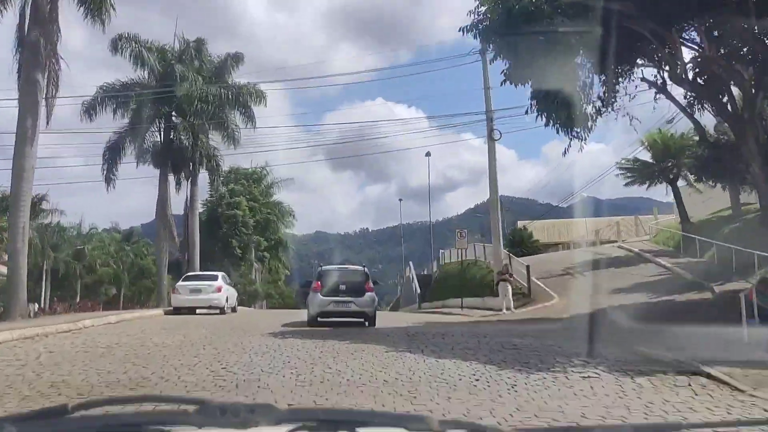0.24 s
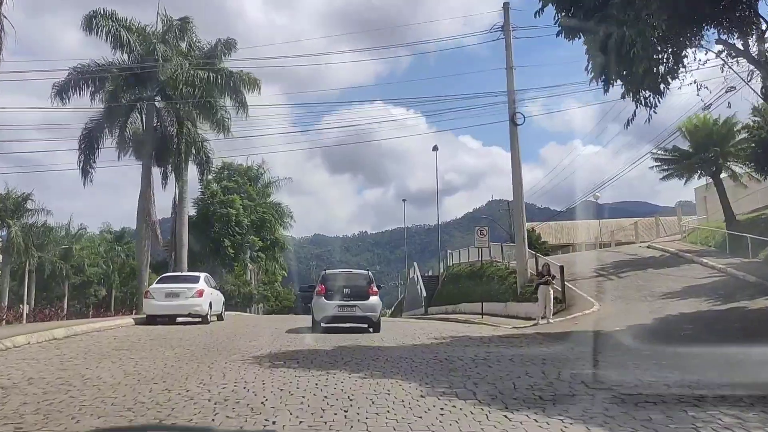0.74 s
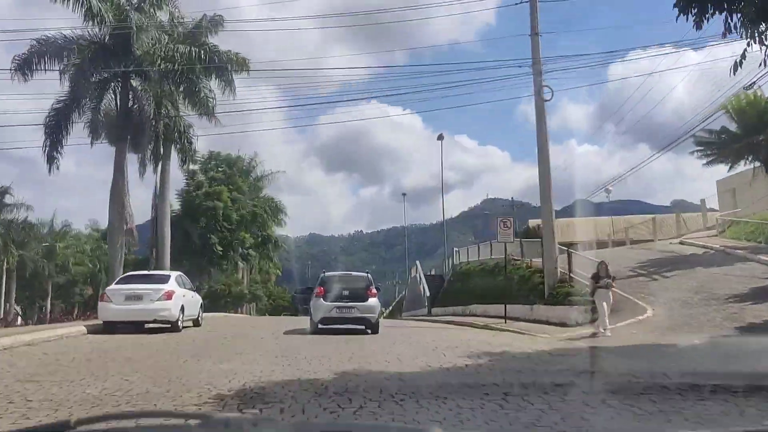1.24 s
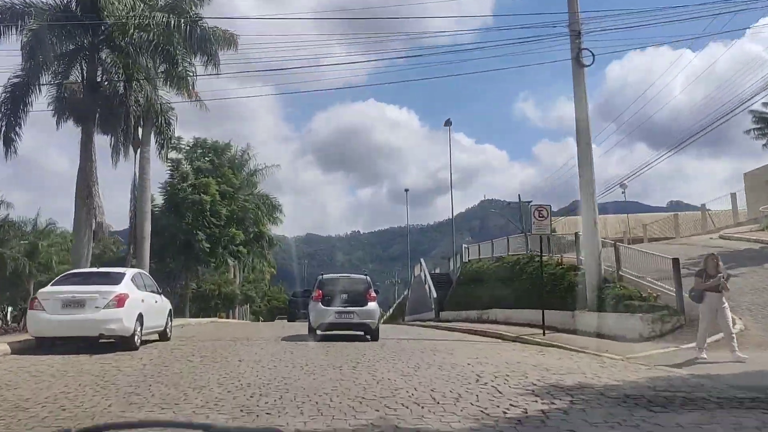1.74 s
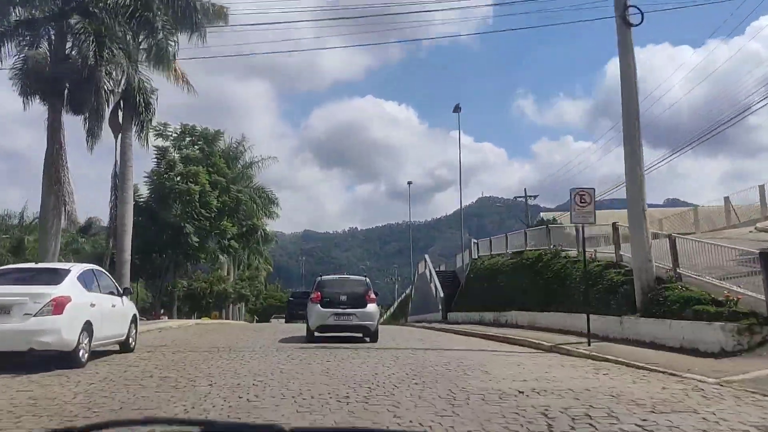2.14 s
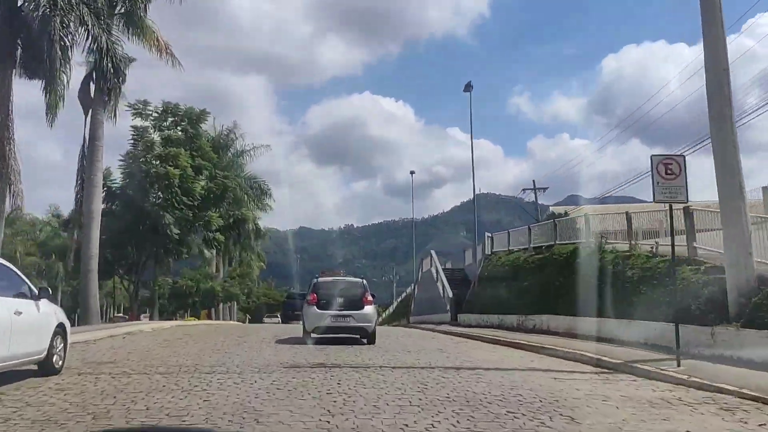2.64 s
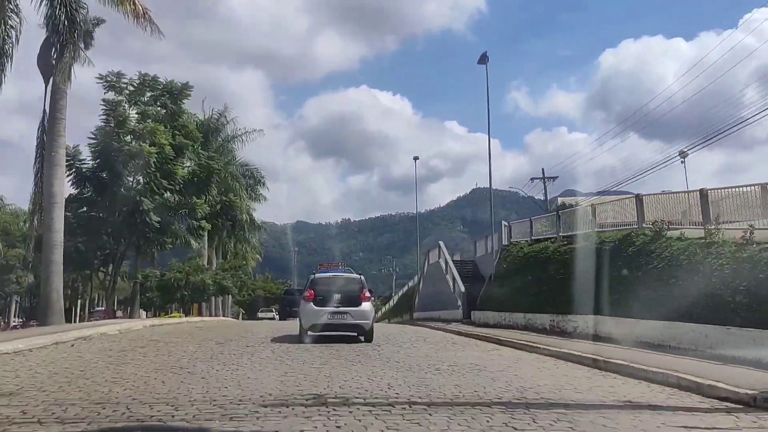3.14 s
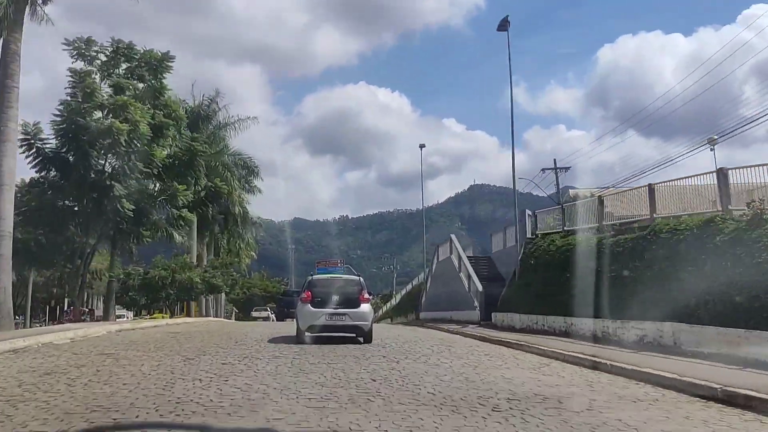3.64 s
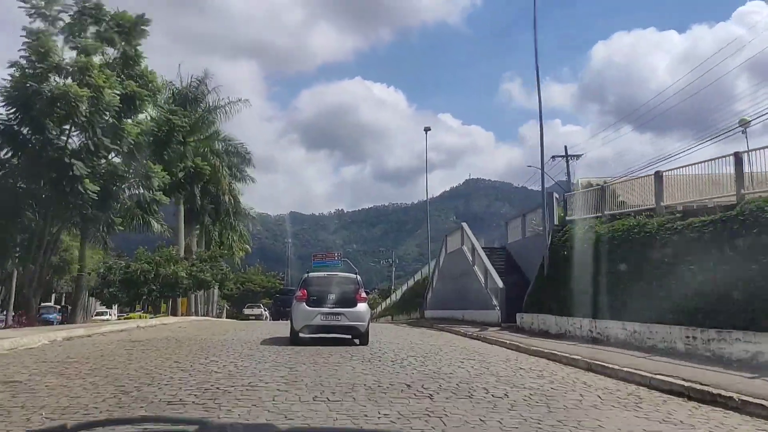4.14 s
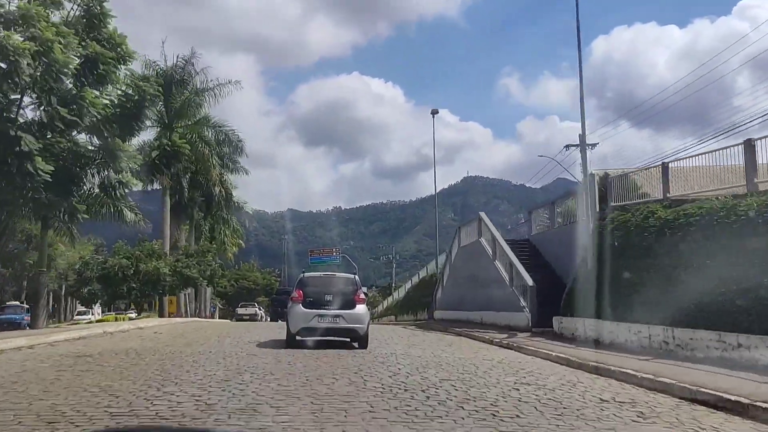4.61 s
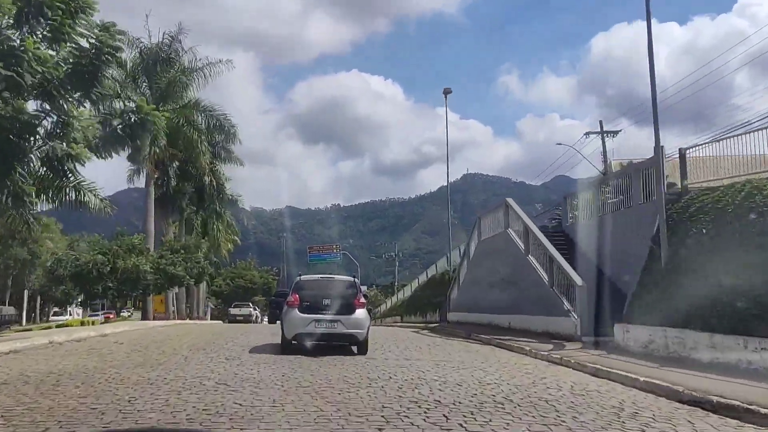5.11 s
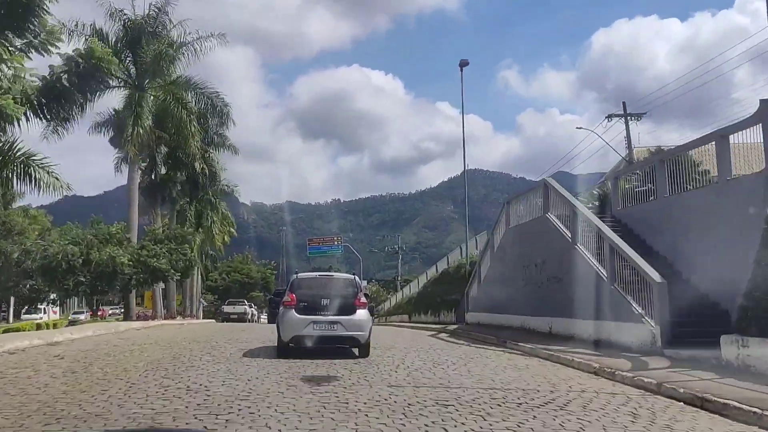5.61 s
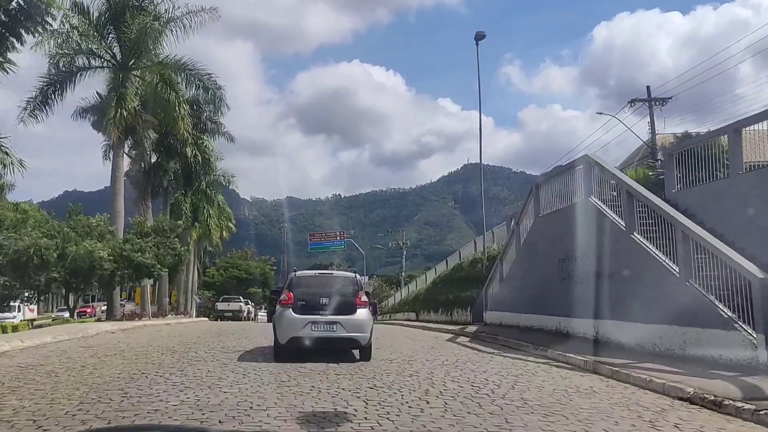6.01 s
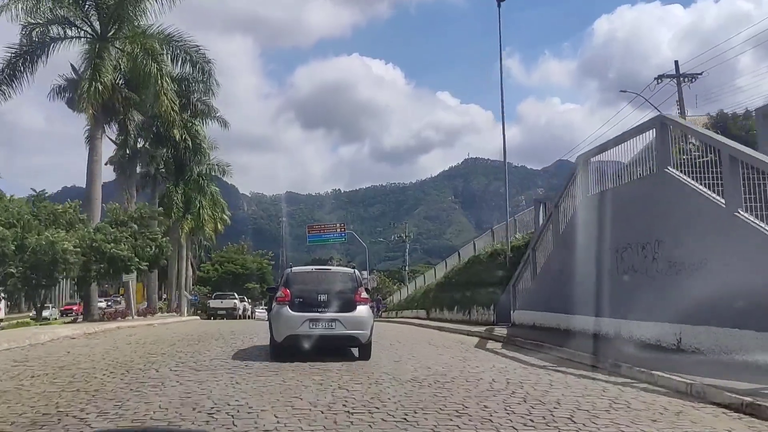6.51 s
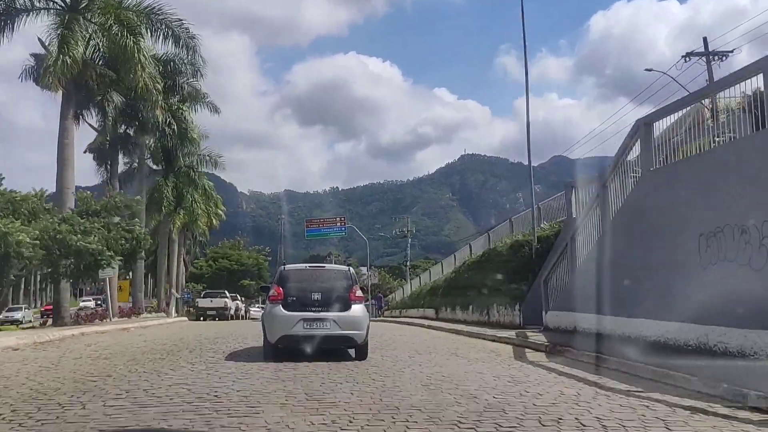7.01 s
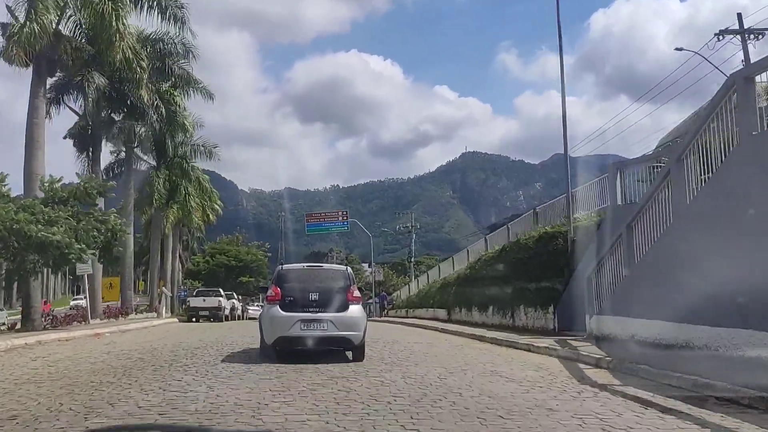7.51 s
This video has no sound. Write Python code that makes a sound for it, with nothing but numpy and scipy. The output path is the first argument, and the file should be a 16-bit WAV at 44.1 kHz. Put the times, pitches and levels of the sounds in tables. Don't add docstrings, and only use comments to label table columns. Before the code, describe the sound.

Inside a slow car on a stone-paved street, tyres drum and boom continuously while the engine hums low and loose trim quietly rattles.

```python
import sys
import numpy as np
from scipy import signal
from scipy.fft import rfft, irfft, next_fast_len
from scipy.io import wavfile
from scipy.ndimage import map_coordinates

SR = 44100
rng = np.random.default_rng(int(sys.argv[2]) if len(sys.argv) > 2 else 0)


def level_to_linear(level):
    exponent = np.asarray(level, float) / 20
    return 10 ** exponent


def to_wav(sig):
    pcm = np.clip(np.atleast_2d(sig), -1, 1) * 32767
    pcm = np.round(pcm).astype(np.int16)
    wavfile.write(sys.argv[1], SR, pcm.T)


N = 342216


def unit(x):
    return x / np.sqrt(np.mean(x ** 2) + 1e-20)


def curves(rows):
    time_s, *columns = np.transpose(rows)
    return [np.interp(np.arange(N) / SR, time_s, column) for column in columns]


def wobble(rate_hz):
    knots = rng.standard_normal(int(SR / 10))
    return map_coordinates(knots, [np.arange(N) * rate_hz / SR])


def filtered(x, response):
    size = next_fast_len(N + SR // 2)
    spectrum = rfft(x, size) * response(np.fft.rfftfreq(size, 1 / SR))
    return irfft(spectrum, size)[..., :N]


def shape(points):
    point_hz, point_db = np.transpose(points)
    return lambda hz: level_to_linear(np.interp(np.log(hz + 1), np.log(point_hz + 1), point_db))


def modes(table):
    def response(hz):
        total = 0
        for k, (centre_hz, width_hz, gain_db) in enumerate(table):
            damping = 1j * hz * width_hz
            total = total + (-1) ** k * level_to_linear(gain_db) * damping / (centre_hz ** 2 - hz ** 2 + damping)
        return total
    return response


def grit(response, spread_db):
    size = next_fast_len(N)
    knocks = rng.standard_normal(size)
    knocks = knocks * level_to_linear(spread_db * np.clip(rng.standard_normal(size), -2.5, 2.5))
    spectrum = rfft(knocks) * response(np.fft.rfftfreq(size, 1 / SR))
    return unit(irfft(spectrum, size)[:N])


def tyres():
    # start_s, cabin_boom_db, floor_drum_db, tyre_roar_db
    road = [(0.0, -26.5, -39, -42.5), (0.11, -49, -34, -45.5), (0.13, -42.5, -35, -43),
            (0.26, -32.5, -31, -41), (0.52, -39, -32, -45), (0.67, -34.5, -34, -35),
            (0.73, -40.5, -38, -50.5), (0.99, -39, -34.5, -43), (1.25, -35, -35.5, -41.5),
            (1.38, -40, -30.5, -41.5), (1.66, -38.5, -38.5, -44.5), (1.71, -29.5, -38, -38),
            (1.75, -38.5, -32, -41.5), (1.94, -41.5, -34.5, -41), (2.03, -34, -34.5, -45),
            (2.14, -40.5, -34, -38.5), (2.18, -34, -33.5, -43), (2.23, -38, -32, -43),
            (2.31, -37, -36, -43), (2.33, -34.5, -31.5, -46), (2.38, -47, -41.5, -47.5),
            (2.44, -42, -32.5, -45), (2.55, -47, -37, -48), (2.61, -37.5, -42, -45.5),
            (2.66, -38.5, -38.5, -43.5), (2.83, -32, -36, -44.5), (2.87, -34.5, -37, -46),
            (3.13, -42, -37.5, -46.5), (3.15, -34, -35.5, -39), (3.44, -31.5, -36.5, -44.5),
            (3.52, -35.5, -33, -43.5), (3.76, -36.5, -36.5, -42.5), (3.87, -43.5, -32, -42),
            (3.91, -34.5, -32, -41.5), (4.11, -37.5, -36.5, -44.5), (4.23, -36, -31.5, -38.5),
            (4.28, -35, -34, -43), (4.56, -38, -35, -41.5), (4.58, -34, -33.5, -42.5),
            (4.8, -37.5, -35, -45), (4.84, -32, -34.5, -37.5), (4.88, -34, -36.5, -49.5),
            (4.93, -35, -36.5, -44.5), (5.06, -35.5, -36, -43.5), (5.12, -34, -33, -41),
            (5.14, -35, -42, -37), (5.17, -40, -36, -44.5), (5.21, -33, -29.5, -40.5),
            (5.27, -37, -35.5, -40.5), (5.53, -36.5, -29.5, -43), (5.57, -34, -34, -37),
            (5.71, -37, -34.5, -45), (5.77, -32, -36, -44.5), (5.9, -41, -30.5, -45),
            (5.97, -36.5, -29, -41), (6.03, -44.5, -38.5, -49.5), (6.38, -36, -33.5, -41),
            (6.46, -40, -32, -47), (6.51, -36, -38.5, -45), (6.65, -39, -34, -42.5),
            (6.72, -28, -34.5, -42.5), (6.79, -39, -31.5, -40.5), (7.0, -34, -35.5, -44),
            (7.02, -36.5, -29.5, -42), (7.15, -30.5, -31, -52), (7.24, -37, -29.5, -39),
            (7.3, -37.5, -38.5, -42.5), (7.46, -35.5, -33, -41), (7.54, -35, -38.5, -42),
            (7.61, -31, -37, -40.5), (7.67, -49, -35.5, -40), (7.72, -31, -44, -40.5),
            (7.76, -41, -33, -41.5)]
    # centre_hz, width_hz, gain_db
    cabin_modes = [(30.2, 10, -11), (47.5, 12, -3), (63.3, 16, -1.5), (98.6, 23, -1)]
    # centre_hz, width_hz, gain_db
    pan_modes = [(126.5, 16, 1), (167.9, 26.5, -4.5), (191.6, 28.6, -5), (258, 46, -13)]
    # centre_hz, width_hz, gain_db
    panel_modes = [(776, 19, 2.5), (551, 68, -11), (2160, 140, -5.5)]
    # freq_hz, density_db (per Hz)
    roar_spectrum = [(120, -26), (200, -2), (276, -3.5), (352, -8.5), (543, -16), (669, -25), (775, -22.5),
                     (933, -27), (2050, -42), (3800, -57.5), (4940, -83.5), (8360, -120)]

    def boom_response(hz):
        return modes(cabin_modes)(hz) / (1 + (hz / 140) ** 2)

    def drum_response(hz):
        return modes(pan_modes)(hz) / (1 + (hz / 330) ** 2) / (1 + (90 / (hz + 1)) ** 4)

    def roar_response(hz):
        return shape(roar_spectrum)(hz) * (1 + abs(modes(panel_modes)(hz)))

    boom_db, drum_db, roar_db = curves(road)
    boom = level_to_linear(boom_db + 2.7) * grit(boom_response, spread_db=2.5)
    drum = level_to_linear(drum_db - 0.65) * grit(drum_response, spread_db=3.5)
    roar = level_to_linear(roar_db + 1.17 + 0.84 * wobble(16)) * grit(roar_response, spread_db=6)
    return boom + drum + roar


def engine():
    # start_s, firing_hz, level_db
    firing = [(0.0, 50.5, -51), (0.04, 50, -42), (0.11, 49.8, -34), (0.17, 45.2, -31.5), (0.43, 44.2, -36),
              (0.69, 49.9, -28.5), (0.8, 51, -40.5), (0.95, 55.3, -31), (1.06, 52.3, -23),
              (1.15, 51.6, -39), (1.27, 51.1, -26), (1.32, 53, -43), (1.4, 56.3, -33), (1.49, 49.9, -39),
              (1.53, 48.9, -23.5), (1.58, 49.6, -40), (1.69, 54.6, -32), (1.79, 49, -53), (1.83, 49.1, -23),
              (1.94, 47.18, -36), (2.07, 50.96, -30.5), (2.36, 50.4, -26.5), (2.59, 50.27, -38),
              (2.64, 50.37, -34.5), (3.0, 48.6, -42), (3.07, 49.88, -30.5), (3.46, 48.68, -32.5),
              (3.54, 50.4, -31), (3.76, 50.3, -35), (3.8, 50.75, -33), (3.87, 53.3, -31),
              (4.0, 53.17, -36.5), (4.08, 56.07, -39), (4.19, 56.06, -36), (4.23, 56.45, -26),
              (4.3, 59.66, -49), (4.34, 59.9, -34), (4.45, 52.46, -51), (4.58, 52.16, -41),
              (4.62, 48.56, -23.5), (4.69, 44, -40), (4.73, 43.7, -50), (5.12, 43.7, -36),
              (5.19, 46.5, -37), (5.25, 50.3, -52), (5.3, 50.33, -38), (5.62, 51.84, -31),
              (5.71, 60.25, -41), (5.77, 61.23, -29), (5.88, 57.7, -39), (5.97, 56.4, -49),
              (6.05, 50.3, -40), (6.09, 50.1, -33), (6.2, 50.5, -46), (6.25, 48.9, -52),
              (6.33, 47.7, -38.5), (6.51, 46.18, -32), (6.89, 47.9, -53.5), (6.98, 50.27, -35.5),
              (7.17, 50.7, -34), (7.22, 50.4, -43), (7.26, 48.5, -38), (7.33, 44, -33), (7.37, 43.52, -40),
              (7.48, 45.76, -31.5), (7.76, 45.0, -46)]
    firing_hz, level_db = curves(firing)
    phase = 2 * np.pi * np.cumsum(firing_hz + 2.48 * wobble(14)) / SR
    second_harmonic = level_to_linear(-10) * np.sin(2 * phase + 0.4 * wobble(7.6))
    return level_to_linear(level_db + 0.5 + 1.6 * wobble(20)) * (np.sin(phase) + second_harmonic)


def trim():
    # start_s, peak_db, dull_part_db, build_up_s
    jolts = [(0.1451, -54, -3.5, 0.012), (0.1935, -48, 3.5, 0.011), (0.2857, -58, -10, 0.015),
             (0.3571, -57.5, 2, 0.017), (0.5242, -68, -3, 0.012), (0.5866, -51.5, -5, 0.013),
             (0.6318, -53, -5, 0.014), (0.745, -61, 1.5, 0.017), (0.8017, -56.5, 2, 0.016),
             (0.8772, -61.5, -10, 0.012), (0.9905, -56.5, -2.5, 0.017), (1.0894, -63, -6, 0.016),
             (1.257, -63, -1, 0.016), (1.3738, -69, -12, 0.013), (1.5194, -59, 0.5, 0.012),
             (1.5576, -59, -4.5, 0.0093), (1.6135, -57.5, 5.5, 0.016), (1.892, -55, -5, 0.016),
             (1.9562, -58, -8, 0.012), (2.0388, -65, -3, 0.012), (2.1015, -56.5, -4, 0.014),
             (2.1573, -59.5, 4, 0.012), (2.2973, -58, 3.5, 0.01), (2.369, -64, -3.5, 0.01),
             (2.657, -59, 4, 0.013), (2.805, -64, 5, 0.012), (2.8356, -66, -3, 0.013),
             (3.1013, -63.5, -0.5, 0.016), (3.1512, -51.5, -23, 0.012), (3.3474, -70, 1, 0.01),
             (3.3813, -66, -6, 0.015), (3.6092, -61, -7, 0.01), (3.653, -62, -1, 0.011),
             (3.7791, -64, 4, 0.012), (3.8333, -58, -2, 0.011), (3.9813, -61.5, -4, 0.011),
             (4.0452, -61, -12, 0.01), (4.0768, -67.5, 5, 0.01), (4.135, -60, -22, 0.016),
             (4.2144, -54.5, 3, 0.011), (4.2554, -54, -18, 0.015), (4.358, -56, -1, 0.0083),
             (4.3919, -53, 2.5, 0.011), (4.5128, -59, 0, 0.0092), (4.576, -56.5, -3, 0.015),
             (4.771, -50.5, 1, 0.015), (5.0903, -58.5, 1, 0.012), (5.1501, -60, -15, 0.0079),
             (5.2908, -62.5, 2, 0.013), (5.3778, -56.5, -11, 0.013), (5.458, -59, -9, 0.011),
             (5.5424, -59.5, 1, 0.013), (5.6475, -67, -7, 0.012), (6.102, -62, -13, 0.013),
             (6.135, -61.5, 0, 0.01), (6.1923, -65, -8, 0.012), (6.328, -62.5, -13, 0.012),
             (6.3834, -74, -7, 0.0096), (6.4373, -80, 0, 0.012), (6.5221, -69, 3, 0.012),
             (6.686, -63, -8, 0.014), (6.7505, -63, -3, 0.013), (6.7855, -66, -2, 0.013),
             (6.9349, -66, -13, 0.013), (7.008, -67, -10, 0.011), (7.0547, -60.5, -4, 0.0089),
             (7.105, -61, -9.5, 0.012), (7.1744, -65, -3, 0.012), (7.2437, -73, 3, 0.01),
             (7.5238, -57, 2, 0.016), (7.5868, -56, 3, 0.0089), (7.652, -64, -6, 0.015)]
    # start_s, level_db
    shake = [(0.0, -73), (0.15, -80), (0.67, -74), (1.19, -77.5), (1.32, -78.5), (1.92, -82.5),
             (2.12, -80.5), (2.53, -75.5), (2.85, -82), (3.11, -84.5), (3.48, -79.5), (3.69, -75.5),
             (3.82, -77), (4.06, -82.5), (4.36, -80), (4.45, -77.5), (4.58, -83), (4.8, -83.5),
             (5.03, -80.5), (5.32, -80), (5.47, -75), (5.9, -84), (6.05, -85), (6.57, -80), (6.7, -82.5),
             (7.39, -84), (7.76, -81.5)]
    # freq_hz, density_db (per Hz)
    fizz_spectrum = [(1530, -29.5), (2600, -1.5), (2880, -4), (3390, -7), (3540, -8), (3720, -11.5),
                     (4680, -9), (5630, -8), (6110, -2), (6860, -5), (7250, 0.5), (7590, -5), (7800, -12.5),
                     (10100, -48), (17200, -120)]
    # freq_hz, density_db (per Hz)
    rattle_spectrum = [(410, -32.5), (700, -1), (790, -1), (897, -4.5), (1420, -14), (1850, -9.5),
                       (2050, -7), (2350, -17), (2560, -22.5), (3800, -30), (4940, -56), (8360, -120)]

    bright_power, dull_power = np.zeros(N + SR), np.zeros(N + SR)
    t = np.arange(SR // 2) / SR
    for start_s, peak_db, dull_db, build_up_s in jolts:
        u = t / max(build_up_s, 0.002)
        swell = level_to_linear(2 * (peak_db - 9.5)) * (u * np.exp(1 - u)) ** 1.94
        start = round(max(start_s - 0.004, 0) * SR)
        bright_power[start:][:len(t)] += swell
        dull_power[start:][:len(t)] += swell * level_to_linear(2 * (dull_db + 3.0))
    steady_power = level_to_linear(2 * (curves(shake)[0] + 3.0))

    fizz = np.sqrt(bright_power[:N] + steady_power) * level_to_linear(2.9 * wobble(30))
    fizz = fizz * grit(shape(fizz_spectrum), spread_db=7.5)
    rattle = np.sqrt(dull_power[:N]) * level_to_linear(5 + 2.6 * wobble(40))
    rattle = rattle * grit(shape(rattle_spectrum), spread_db=4.5)
    return fizz + rattle


def mount():
    # start_s, peak_db
    ticks = [(0.0585, -51.5), (0.1283, -50.5), (0.195, -50), (0.253, -48), (0.316, -51), (0.3775, -50),
             (0.423, -64), (0.6461, -46), (0.7744, -70), (1.0889, -47), (1.2053, -49), (1.283, -48.5),
             (1.5194, -61), (1.5825, -48), (1.7489, -62), (1.9075, -55), (1.977, -52), (2.0373, -48),
             (2.1121, -50), (2.368, -50.5), (2.4293, -56), (2.5032, -51), (2.6256, -50), (2.6577, -65),
             (2.7019, -55.5), (2.808, -60), (2.8356, -52), (3.023, -63), (3.1503, -42.5), (3.2128, -64),
             (3.494, -63), (3.8164, -47), (3.9761, -55.5), (4.0848, -51), (4.1497, -58), (4.2141, -51.5),
             (4.359, -46), (4.4128, -52.5), (4.6738, -55), (4.7734, -63), (5.0898, -60), (5.2915, -55),
             (5.469, -57), (5.5198, -50), (5.5765, -51), (5.6473, -50), (5.7438, -59), (5.8105, -59),
             (5.8672, -53), (5.9287, -62), (5.968, -64), (6.015, -67), (6.0762, -57), (6.1362, -50),
             (6.1915, -54), (6.327, -47.5), (6.3834, -55), (6.4366, -55), (6.5467, -50.5), (6.6112, -56.5),
             (6.6845, -56), (6.7501, -53), (6.8106, -53.5), (6.8848, -57), (6.9516, -49.5), (7.0092, -49.5),
             (7.054, -47), (7.109, -56), (7.1878, -62), (7.2429, -52.5), (7.4078, -63), (7.5222, -45),
             (7.5835, -52), (7.652, -45)]
    # freq_hz, level_db, t60_s
    part_modes = [(1430, -4, .025), (2100, -6, 0.019), (2680, -3, 0.0095), (3260, 3.5, 0.0066),
                  (4100, -6, 0.0053), (5540, -15, 0.011), (6200, -11.5, 0.014), (6900, -17, 0.014),
                  (7460, -13, 0.018)]
    out, t = np.zeros(N + SR), np.arange(SR // 10) / SR
    onset = 1 - np.exp(-t / 0.00059)
    scatter = rng.standard_normal((len(ticks), len(part_modes)))
    for (start_s, peak_db), vary in zip(ticks, scatter):
        ring = np.zeros(len(t))
        for (freq_hz, level_db, t60_s), v in zip(part_modes, vary):
            ring += level_to_linear(level_db + 1.2 * v - 60 * t / t60_s) * np.sin(2 * np.pi * freq_hz * t)
        start = round((start_s + 0.0011) * SR)
        out[start:][:len(t)] += level_to_linear(peak_db + 2.5) * ring * onset
    return out[:N]


def scene():
    return (tyres() + engine() + trim() + mount())[None]


def low_pass(x):
    return signal.sosfilt(signal.butter(12, 8480, fs=SR, output="sos"), x)


def record(dry):
    top_hz = 7610
    mix = filtered(dry, lambda hz: 1 / (1 + (hz / top_hz) ** 90))
    return low_pass(mix)


dry = scene()
out = record(dry)
to_wav(out)
```